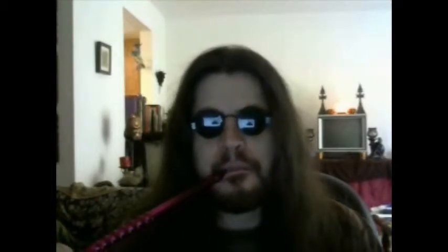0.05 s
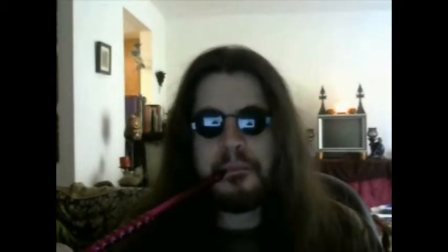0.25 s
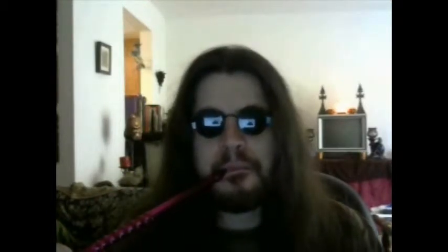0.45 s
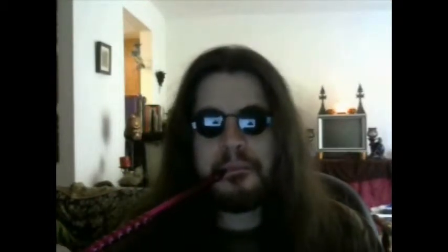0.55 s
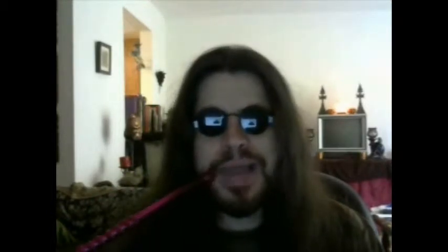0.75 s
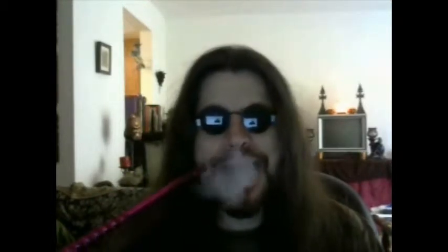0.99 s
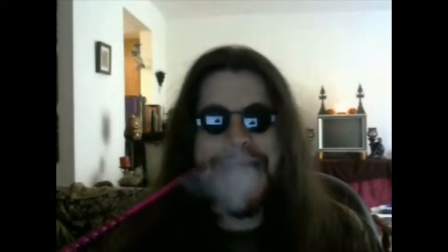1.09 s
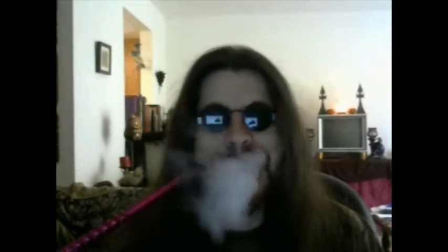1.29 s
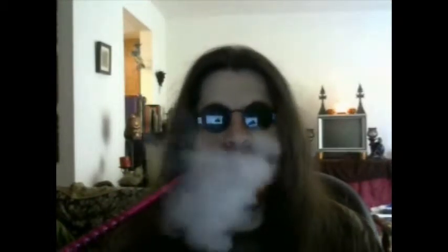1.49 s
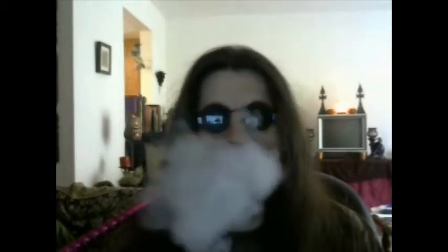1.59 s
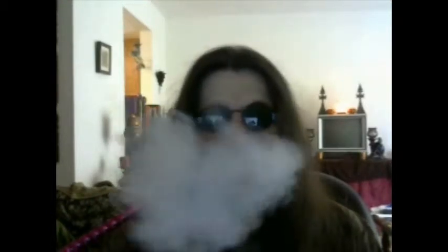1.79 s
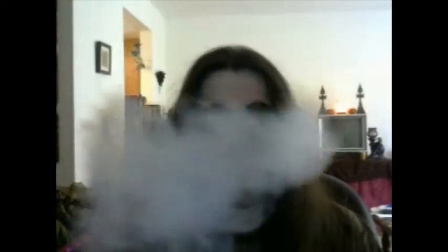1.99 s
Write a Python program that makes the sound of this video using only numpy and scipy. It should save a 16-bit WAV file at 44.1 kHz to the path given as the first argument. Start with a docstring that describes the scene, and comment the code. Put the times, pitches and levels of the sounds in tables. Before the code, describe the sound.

A hookah gurgles quickly in a quiet room, each bubble a hollow gulp with a little spray, and two dry ticks among them. The bubbling stops in under a second, and only room hush and faint low bumps remain.

```python
"""Hookah draw

Smoke is drawn through a hookah for 0.7 s: about 16 big bubbles a second leave the stem, each with a hollow
gulp. Each heaves the water, bursts at the surface, rings the vase and throws a short spray. Two dry ticks fall
among them, and a faint high tick follows just after. Then the water rests; a quiet room and faint, soft bumps
remain."""
import sys
import numpy as np
from scipy import signal
from scipy.fft import rfft, irfft, next_fast_len
from scipy.io import wavfile
from scipy.ndimage import map_coordinates

SR = 44100
rng = np.random.default_rng(int(sys.argv[2]) if len(sys.argv) > 2 else 0)


def log_audio(samples):
    """Write samples as a 16-bit WAV file to the path given in sys.argv[1]."""
    # one column per channel
    frames = np.atleast_2d(samples).T
    # limit to full scale, then quantise
    limited = np.clip(frames, -1, 1)
    pcm = np.round(limited * 32767).astype(np.int16)
    wavfile.write(sys.argv[1], SR, pcm)


N = 90140

# Bubbles bursting; the last row, at 0.806 s, is a faint high tick. Each row: peak time in seconds, nominal rise
# in seconds, splash level in dB, # vase level in dB, vase pitch in Hz, spray level in dB, fizz level in dB,
# fizz cutoff in Hz.
BURSTS = [(.008, 0.018, -28.5, -39, 1564, -49.5, -49, 9000),
          (.076, 0.016, -29.5, -42.5, 1535, -41.5, -43.5, 8500),
          (0.117, 0.0026, -32, -67, 1550, -70, -65.5, 7500),
          (.141, 0.02, -41.5, -47, 1548, -64, -67.5, 7000),
          (.180, 0.0099, -25.5, -37.5, 1600, -47, -59, 7000),
          (.187, 0.011, -33.5, -30.5, 1550, -40.5, -48, 11500),
          (.207, 0.0037, -43.5, -45, 1560, -64, -60.5, 10500),
          (.254, 0.0078, -30, -50, 1540, -41, -51, 7300), (.268, .009, -44, -34, 1545, -54.5, -66.5, 7200),
          (.326, 0.028, -38, -53.5, 1555, -58, -56, 8500),
          (.384, 0.024, -53, -56.5, 1555, -61.5, -66, 7500),
          (.399, 0.0069, -45, -51, 1550, -63, -62.5, 7500),
          (0.441, 0.014, -45.5, -31.5, 1575, -49.5, -50.5, 8350),
          (.459, 0.0066, -53, -45.5, 1570, -64, -63, 7300), (.512, 0.019, -33.5, -48, 1504, -59, -52, 7800),
          (0.556, 0.024, -37.5, -33.5, 1537, -49, -57, 6300),
          (0.566, 0.0062, -53, -37.5, 1513, -63.5, -52, 7200),
          (.615, 0.022, -33, -39, 1580, -58, -52, 9000), (.646, 0.0036, -32.5, -42, 1550, -62.5, -84, 7000),
          (.684, 0.0073, -45.5, -72, 1550, -66.5, -71, 7000),
          (.806, 0.00315, -72, -79, 1550, -79, -71, 7000)]


def amp(db):
    """Decibels to gain."""
    return 10 ** (np.asarray(db) / 20)


def unit(x):
    """Scale to rms 1."""
    return x / np.sqrt(np.mean(x ** 2) + 1e-20)


def clock():
    """Seconds at each sample."""
    return np.arange(N) / SR


def filtered(x, response):
    """Apply a complex response, given as a function of Hz."""
    size = next_fast_len(N + SR // 2)
    return irfft(rfft(x, size) * response(np.fft.rfftfreq(size, 1 / SR)), size)[:N]


def coloured(x, points):
    """Shape x by (Hz, dB) points; rms 1."""
    points_hz, db = np.transpose(points)
    return unit(filtered(x, lambda hz: amp(np.interp(np.log(hz + 1), np.log(points_hz + 1), db))))


def resonated(x, modes):
    """Parallel resonators of alternating sign; rms 1."""
    def response(hz):
        return sum((-1) ** k * amp(db) * 1j * hz * width_hz / (mode_hz**2 - hz**2 + 1j * hz * width_hz)
                   for k, (mode_hz, width_hz, db) in enumerate(modes))
    return unit(filtered(x, response))


def wobble(knots_per_s):
    """Smooth random curve."""
    return map_coordinates(rng.standard_normal(8192), [clock() * knots_per_s], mode="wrap")


def swell(peak_s, rise_s, t60_s):
    """Rounded rise, exponential fall."""
    t = clock() - peak_s
    attack = np.sin(np.pi / 2 * np.clip(1 + t / (rise_s + 1e-5), 0, 1)) ** 2
    return attack * amp(-60 * np.maximum(t, 0) / t60_s)


def damped_tones(rows, t60_s, waver_rad, climb_per_s=0):
    """Swelling, decaying sines with unsteady phase and an optional relative pitch climb."""
    out = np.zeros(N)
    for peak_s, hz, db, rise_s in rows:
        glide_hz = hz * (1 + climb_per_s * np.clip(clock() - peak_s, -t60_s, t60_s))
        cycles = np.cumsum(glide_hz) / SR + rng.random()
        tone = np.sin(2 * np.pi * cycles + waver_rad * wobble(170))
        out += amp(db) * swell(peak_s, 1.3 * rise_s, t60_s) * tone
    return out


def droplets(per_s=3500):
    """Dense patter of tiny, uneven impacts."""
    return (rng.random(N) < per_s / SR) * rng.standard_normal(N)


def hush():
    """Steady room noise."""
    # Each row: frequency in Hz, relative spectral density in dB.
    spectrum = [(20, -42), (38, -24.5), (58, -1.5), (88, -20), (120, -5.5), (240, -3), (350, -10.5),
                (560, -8.5), (780, -8), (1000, -13.5), (2000, -20), (3200, -24.5), (5200, -28.5),
                (6900, -21), (8200, -31), (10000, -36.5), (15500, -51.5)]
    return amp(-68.5) * coloured(rng.standard_normal(N), spectrum)


def gulps():
    """Air pockets ring under water as they leave the stem, rising in pitch."""
    # Each row: peak time in seconds, pitch in Hz, level in dB, nominal rise in seconds.
    pockets = [(.006, 551, -21.5, 0.0047), (.021, 535, -19.5, 0.016), (.019, 1040, -32, .008),
               (.062, 522.5, -23, .004), (.075, 522.4, -17, .009), (.089, 1011, -32, .006),
               (.093, 527, -29, 0.012), (.126, 530, -23, 0.0028), (.145, 1021, -34.5, .009),
               (.181, 551.5, -21.5, 0.0097), (.206, 1025, -34.5, .005), (.250, 497.2, -10.5, .005),
               (.254, 590.5, -15.5, .004), (.253, 720, -25, 0.0045), (.288, 461, -23, 0.012),
               (.308, 501, -29.5, 0.01), (.318, 514.7, -20.5, 0.0023), (.329, 709.7, -33, .008),
               (.385, 557.5, -29.5, 0.0049), (.438, 511, -18.5, 0.0041), (.440, 1320, -41.5, 0.0062),
               (.512, 565.4, -22, 0.013), (.525, 539, -19, 0.0019), (.541, 549.2, -17.5, .005),
               (.550, 541.9, -12.5, 0.013), (.576, 550, -31.5, 0.0056), (.593, 545, -27, 0.01),
               (.611, 525, -21.5, .009), (.631, 1014, -32.5, .006), (.647, 720, -26.5, 0.0017),
               (.648, 1175, -35.5, 0.0034), (.665, 521.6, -24, 0.0062), (.681, 520.5, -29.5, 0.0072),
               (.693, 760, -40, .008)]
    return damped_tones(pockets, t60_s=0.04, waver_rad=0.12, climb_per_s=1.1)


def heaves(highpass_hz=58.4):
    """Each bubble heaves the water above it."""
    # Each row: peak time in seconds, pitch in Hz, level in dB, nominal rise in seconds.
    lifts = [(.008, 229, -27, .008), (.031, 192, -38, .006), (.061, 188, -30, 0.0056),
             (.076, 224.3, -36, .005), (.143, 235.4, -38, .008), (.177, 208.4, -25, 0.0038),
             (.190, 235, -31, .006), (.253, 230, -30.5, 0.0068), (.256, 150, -38.5, 0.019),
             (.320, 200, -33, .007), (.384, 241, -34.5, .012), (.431, 192.8, -31, .009),
             (.452, 188.2, -34, 0.032), (.515, 237, -31, .012), (.551, 226, -26.5, .007),
             (.581, 237.5, -34.5, .009), (.600, 234.4, -31, .008), (.629, 230, -35, .012),
             (.656, 225.8, -33, .010), (.710, 154.3, -38, 0.011)]
    motion = damped_tones(lifts, t60_s=0.055, waver_rad=0.5)
    return filtered(motion, lambda hz: (1j * hz / (highpass_hz + 1j * hz)) ** 2)


def splash():
    """Droplets resonate in the vase's hollow."""
    # Each row: resonance in Hz, width in Hz, relative gain in dB.
    modes = [(538, 510, -8.5), (740, 60, 3.5), (779.6, 45, -3.5), (915, 140, -6.5), (1038.7, 49, -6),
             (1192, 18, -6.5), (1318, 23, -7), (1377, 40, -13.5), (1737, 38, -13)]
    hollow = resonated(droplets(), modes)
    return coloured(hollow, [(60, -5.5), (300, -2), (1680, -9.5), (1880, -26), (4000, -43)])


def spray():
    """Thrown droplets patter, mostly at 2-4 kHz."""
    # Each row: frequency in Hz, relative level in dB.
    spectrum = [(1500, -28), (2130, -9.5), (2290, 0.5), (2550, -8), (3000, -0.5), (3450, -1.5), (3650, 0.5),
                (3900, -12.5), (4150, -5), (4800, -16.5), (5400, -24.5), (8000, -48)]
    return coloured(droplets(), spectrum)


def fizz():
    """The spray's treble: patter with a glassy ring."""
    # Each row: frequency in Hz, relative level in dB.
    spectrum = [(3500, -34), (4800, -8), (5900, 0.5), (6500, -3), (7000, -9), (7500, -1), (8200, -8),
                (9600, 0.5), (10400, -14.5), (15000, -46)]
    # Each row: resonance in Hz, width in Hz, relative gain in dB.
    modes = [(5540, 60, -5.5), (5990, 47, -2), (6530, 74, -3.5), (6900, 51, -5), (8190, 50, -4.5),
             (8250, 70, -9)]
    patter = coloured(droplets(), spectrum)
    ring = coloured(resonated(droplets(), modes), spectrum)
    return unit(patter + amp(-4.5) * ring)


def bursts(vase_flutter_db=3.5, vase_waver_rad=0.53):
    """Bubbles break the surface: each gives a splash, an unsteady vase ring, spray and fizz. The last row gives
    a faint high tick."""
    textures = [splash(), spray(), fizz(), amp(vase_flutter_db * wobble(110)), vase_waver_rad * wobble(130)]
    out = np.zeros(N)
    for peak_s, rise_s, splash_db, vase_db, vase_hz, spray_db, fizz_db, cutoff_hz in BURSTS:
        hollow, patter, glassy, flutter, waver = np.roll(textures, rng.integers(N), axis=1)
        glassy = unit(filtered(glassy, lambda hz: 1 / (1 + (hz / cutoff_hz) ** 18)))
        ring = unit(flutter * np.sin(2 * np.pi * (vase_hz * clock() + rng.random()) + waver))
        out += amp(splash_db) * swell(peak_s, 0.77 * rise_s, t60_s=0.1) * hollow
        out += amp(vase_db) * swell(peak_s, 1.4 * rise_s, t60_s=0.06) * ring
        out += amp(spray_db) * swell(peak_s + 0.001, rise_s, t60_s=0.088) * patter
        out += amp(fizz_db) * swell(peak_s + 0.002, rise_s, t60_s=0.073) * glassy
    return out


def room(x, low_wet_db=-29.5, high_wet_db=-11):
    """Short reverb of a furnished room; treble dies first."""
    low = coloured(rng.standard_normal(N), [(150, -3.5), (500, 2), (900, -6), (1400, -20), (4000, -52)])
    low *= swell(0.0031, 0.005, t60_s=0.28)
    high = coloured(rng.standard_normal(N), [(500, -29), (1100, -2), (2000, -3), (9000, -2)])
    high *= swell(0.006, 0.015, t60_s=0.15)
    tail = amp(low_wet_db) * low / np.linalg.norm(low) + amp(high_wet_db) * high / np.linalg.norm(high)
    return signal.fftconvolve(x, tail)[:N]


def ticks(lowpass_hz=2560):
    """Two dry ticks among the bubbles."""
    # Each row: time in seconds, level before the low-pass in dB.
    impulses = [(.2532, -19.5), (0.6206, -10.5)]
    x = np.zeros(N)
    for time_s, db in impulses:
        x[round(time_s * SR)] = amp(db)
    return filtered(x, lambda hz: 1 / (1 + 1j * hz / lowpass_hz))


def bumps():
    """Faint, soft bumps after the water rests."""
    # Each row: peak time in seconds, pitch in Hz, level in dB, nominal rise in seconds.
    thuds = [(1.238, 245, -58.5, 0.012), (1.272, 271.1, -58.5, .01), (1.55, 218.8, -63, .03),
             (1.594, 190, -54.5, 0.015), (1.673, 195, -53.5, .016), (1.714, 157, -51.5, .008),
             (1.774, 170.2, -56.5, 0.016), (1.802, 201.4, -55.5, 0.017), (1.858, 140, -62, 0.0096),
             (1.998, 140.8, -56.5, 0.0081), (2.036, 174.8, -55, 0.018)]
    return damped_tones(thuds, t60_s=0.079, waver_rad=0.95)


def scene():
    """Hookah and bumps over the room's hush, mono."""
    water = gulps() + heaves() + bursts()
    return (water + room(water) + ticks() + bumps() + hush())[None]


def record(dry):
    """Microphone band limit: a linear roll-off to silence."""
    stop_hz, slope_width_hz = 16130, 700
    return filtered(dry[0], lambda hz: np.clip((stop_hz - hz) / slope_width_hz, 0, 1))[None]


dry = scene()
out = record(dry)
log_audio(out)
```